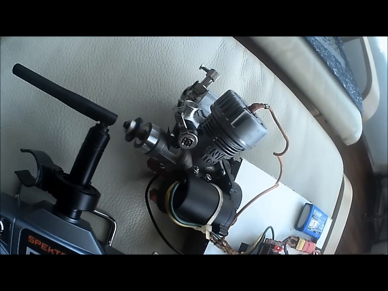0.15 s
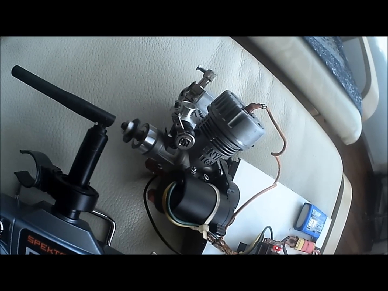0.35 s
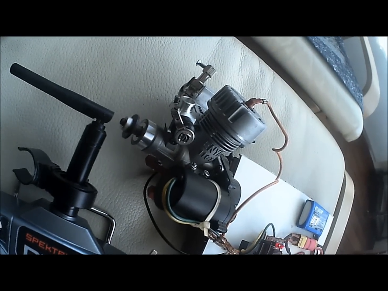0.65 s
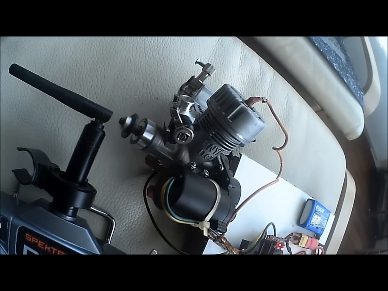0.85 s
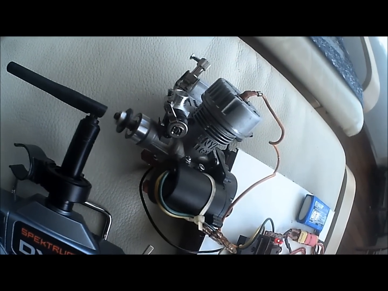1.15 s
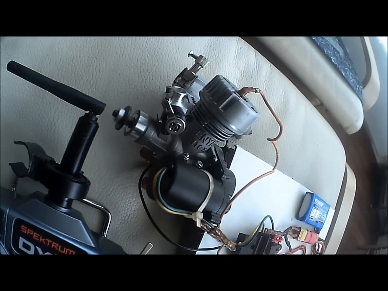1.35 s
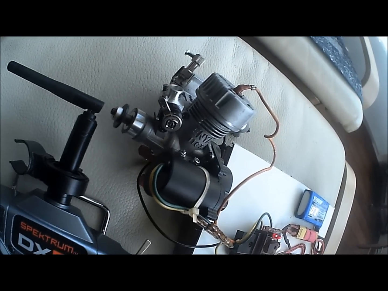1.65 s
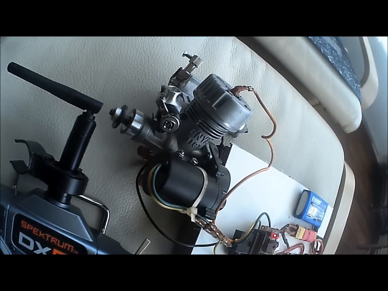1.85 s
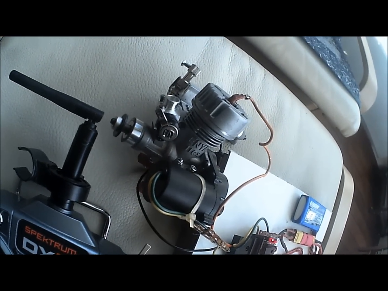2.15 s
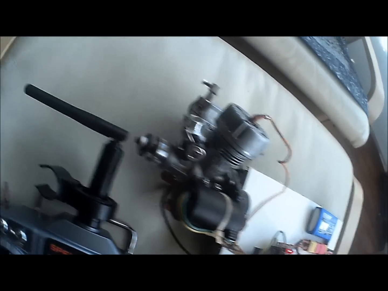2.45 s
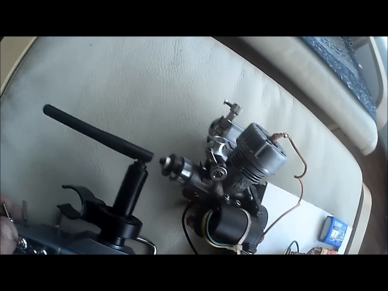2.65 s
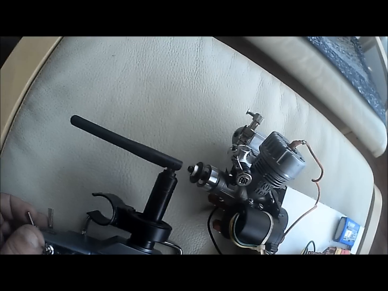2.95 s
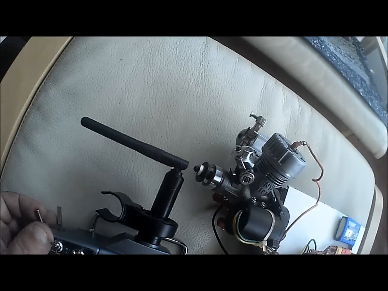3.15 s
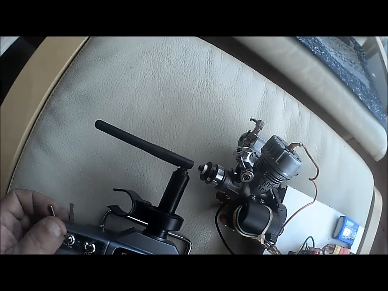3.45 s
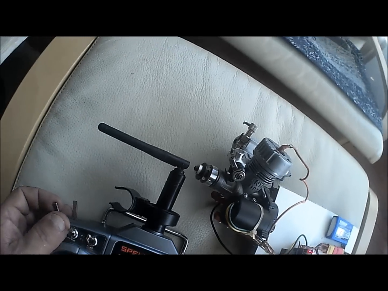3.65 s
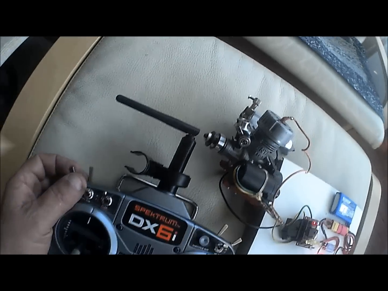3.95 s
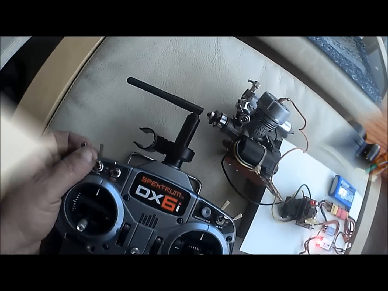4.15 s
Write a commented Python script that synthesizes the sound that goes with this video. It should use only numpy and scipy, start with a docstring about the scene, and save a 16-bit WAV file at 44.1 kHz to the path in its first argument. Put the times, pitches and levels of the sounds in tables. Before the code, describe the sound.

An electric starter spins a small model engine, close to the microphone in a dull, quiet room. It jumps to speed almost at once, then holds a steady buzz of about seventy hollow pops a second, with crankcase knocks, fine metal rattle and high hiss. The microphone draws back around the middle, softening the rattle; near the end the pitch rises slightly.

```python
"""A dull room background, a faint hiss and grinding metal are there at once; then come the pops of an engine.
An electric starter spins a small model engine at about 70 turns a second, close up; it does not fire.
Each turn the exhaust port lets out a puff that rings as a hollow pop; about half a turn later the piston
knocks the crankcase, loose metal rattles in runs of tiny impacts, and air hisses as shaped noise.
The microphone draws back, and near the end the load eases: the shaft speeds up and the pop changes colour."""
import sys
import numpy as np
from scipy import signal
from scipy.fft import rfft, irfft
from scipy.io import wavfile

SR = 44100
rng = np.random.default_rng(int(sys.argv[2]) if len(sys.argv) > 2 else 0)


def wav_record(signal):
    """Record a signal, one row per channel, as 16-bit PCM in the file named by sys.argv[1]."""
    frames = np.transpose(np.atleast_2d(signal))
    bounded = np.clip(frames, -1, 1)
    # unit amplitude maps onto the largest positive 16-bit level
    quanta = np.round(bounded * 32767).astype(np.int16)
    wavfile.write(sys.argv[1], SR, quanta)


N = 189012
TIME = np.arange(N) / SR  # s


def gain_of(db):
    """Logarithmic level: 20 dB is a tenfold amplitude."""
    return 10 ** (np.asarray(db) / 20)


def evened(x):
    """Normalisation: scales a signal to an rms of one."""
    return x / np.sqrt(np.mean(x ** 2) + 1e-20)


def curve(rows):
    """Linear interpolation: a timed table, at every sample."""
    return np.interp(TIME, *np.transpose(rows))


def wander(low_hz, high_hz):
    """Band-limited noise: random motion between two rates, rms one."""
    hz = np.fft.rfftfreq(N, 1 / SR)
    band = (hz > low_hz) / (1 + (hz / high_hz) ** 4)
    return evened(irfft(rfft(rng.standard_normal(N)) * band, N))


def colour(x, db_at, size=8192):
    """Minimum-phase filtering with gain db_at(Hz) in dB: a body rings after a blow, never before."""
    level_db = np.maximum(db_at(abs(np.fft.fftfreq(size, 1 / SR))), -100)
    log_gain = np.log(gain_of(level_db))
    # the Hilbert transform of the log gain gives the phase of a causal ring
    ring = np.fft.ifft(np.exp(np.conj(signal.hilbert(log_gain)))).real
    return signal.oaconvolve(x, ring[:size // 2])[:N]


def spectrum(points):
    """Spectral envelope: a gain rule that joins (frequency [Hz], level [dB]) points on a log axis."""
    hz, db = np.transpose(points)
    return lambda f: np.interp(np.log(f + 1), np.log(hz + 1), db)


def resonances(modes, order=3):
    """Modal summation: the powers of steep-sided modes add, with deep valleys between them."""
    def db_at(f):
        power = sum(gain_of(db) ** 2 / (1 + ((f - hz) / width) ** 2) ** order for hz, width, db in modes)
        return 10 * np.log10(power)
    return db_at


# crank angles [turns]: port opens, piston knocks, play rattles, air whistles
PORT_AT, KNOCK_AT, RATTLE_AT, WHISTLE_AT = .311, .781, .805, .01


def passes(turns, angle):
    """Phase crossing: the times at which the crank passes an angle [turns]."""
    return np.interp(np.arange(angle % 1, turns[-1], 1), turns, TIME)


def blows(times, db):
    """Impulsive excitation at exact times, each impulse shared between two samples."""
    at = np.clip(times * SR, 0, N - 2)
    first, part = at.astype(int), at % 1
    out = np.zeros(N)
    np.add.at(out, first, gain_of(db) * (1 - part))
    np.add.at(out, first + 1, gain_of(db) * part)
    return out


def bursts(times, db, hold, decay):
    """Amplitude modulation: noise starts at each time, holds and dies away exponentially [s]."""
    t = TIME[:SR // 20]
    power = np.exp(-2 * np.maximum(t - hold, 0) / decay)
    total_power = abs(signal.oaconvolve(blows(times, 2 * db), power)[:N])  # doubled dB: power, not amplitude
    return evened(np.sqrt(total_power) * rng.standard_normal(N))


# the spin-up begins this far short of speed [turns/s] and closes the gap with this time constant [s]
SHORT_HZ, SPIN_UP_S = 18.26, .04


def spin_up():
    """Exponential relaxation: the share of the spin-up still to come, one at the start, soon zero."""
    return np.exp(-TIME / SPIN_UP_S)


# microphone drawing back from the engine: (time [s], share of the way [0-1])
MIC_AWAY = [(2.4, 0.4), (2.7, 0.67), (3.3, 0.91), (4.29, 1)]
# easing of the load: (time [s], easing [0-1])
LOAD_EASE = [(3.3, 0.15), (3.52, 0.82)]


def level(db, start_db, away_db, eased_db):
    """Additive gains in dB, as the shaft spins up, the microphone draws back and the load eases."""
    return gain_of(db + start_db * spin_up() + away_db * curve(MIC_AWAY) + eased_db * curve(LOAD_EASE))


# limit of the random swell [dB], rate above which it falls away [Hz], limit of the extra jolt [dB]
SHAKE_DB, SHAKE_HZ, JOLT_DB = 1.5, 3.6, 2.5
JOLT_HZ_PER_S = 4.3  # acceleration at which the jolt levels off [turns/s per s]


def shaking(speed):
    """Forced vibration on the mount: swells at random within limits, and more as the shaft speeds up."""
    gathering = np.maximum(np.gradient(speed, TIME), 0)
    jolt = np.tanh(gathering / JOLT_HZ_PER_S)
    swell = np.tanh(wander(1, SHAKE_HZ))
    return gain_of(SHAKE_DB * swell + JOLT_DB * jolt)


FLUTTER_S = .00007  # stray from even turning, before the shake scales it [s rms]


def crank(speed, shake, slow_hz=6, fast_hz=17):
    """Phase integration: speed adds up to angle [turns], slightly ahead and behind as the engine shakes."""
    stray = FLUTTER_S * shake * wander(slow_hz, fast_hz)
    return np.cumsum(speed) / SR + speed * stray


# room background: (frequency [Hz], relative level [dB per Hz])
ROOM_SPECTRUM = [(15, -8), (55, -7), (100, -11), (300, -5), (1200, -11.5), (2300, -14), (15000, -28.5)]


def room(level_db=-41):
    """Stationary coloured noise: a dull, steady background."""
    return gain_of(level_db) * evened(colour(rng.standard_normal(N), spectrum(ROOM_SPECTRUM)))


# air squeezed past the piston: (frequency [Hz], relative level [dB per Hz])
HISS_SPECTRUM = [(4000, -50), (9000, -24), (10850, -18), (11350, -1), (12550, -2), (12950, -10),
                 (13300, -9), (13600, -2), (14800, -3), (15200, -10), (15800, -25)]
# thin whistles in that air: (frequency [Hz], width [Hz], relative level [dB])
WHISTLE_MODES = [(11700, 120, -5), (12305, 30, -5), (14470, 70, 0)]
# hiss: (at full speed [dB], change at start of spin-up [dB], when drawn back [dB], when eased [dB])
HISS_LEVELS = (-33.5, -3, -1.5, -5)
# whistles swell, then fade as the microphone leaves their path: (time [s], level [dB])
WHISTLE_LEVELS = [(0, -39), (.6, -34.5), (1.4, -34.5), (1.85, -31.5), (2.45, -36), (2.7, -45), (4.29, -44)]


def leak(turns, spread_db=0.1, steady_db=-8):
    """Turbulent flow noise: compressed air hisses past the piston at each stroke's top, then whistles."""
    def gusts(angle, hold, decay):
        """Periodic modulation: one noise burst a turn, at the given crank angle."""
        times = passes(turns, angle)
        return bursts(times, spread_db * rng.standard_normal(len(times)), hold, decay)
    air = gusts(RATTLE_AT, hold=.0042, decay=.003)
    air = air + gain_of(steady_db) * rng.standard_normal(N)
    hiss = evened(colour(air, spectrum(HISS_SPECTRUM)))
    squeeze = gusts(WHISTLE_AT, hold=.001, decay=.0018)
    whistle = evened(colour(squeeze, resonances(WHISTLE_MODES, order=2)))
    return level(*HISS_LEVELS) * hiss + gain_of(curve(WHISTLE_LEVELS)) * whistle


def bounces(times, clack_db, modes, spread_db, fade_db, grind_db, gap_s=.0003, count=24):
    """Repeated impact: fading runs of tiny hits, over faint steady grinding, ring the modes of one part."""
    ordinary_db = spread_db * np.minimum(rng.standard_normal(len(times)), 1.3)
    size_db = np.where(clack_db > 0, clack_db, ordinary_db)
    hit_times = times[:, None] + gap_s * (np.arange(count) + rng.random((len(times), count)))
    hit_db = size_db[:, None] - fade_db * np.arange(count)
    hits = evened(blows(hit_times.ravel(), hit_db.ravel()))
    grinding = gain_of(grind_db) * rng.standard_normal(N)
    return colour(hits + grinding, resonances(modes))


# cylinder and fins, shaken by the rod: (frequency [Hz], width [Hz], relative level [dB])
FIN_MODES = [(2790, 220, -8), (3260, 380, -8.5), (3550, 184, 2)]
# starter gears: (frequency [Hz], width [Hz], relative level [dB])
GEAR_MODES = [(4690, 134, -9), (4865, 84, -2.5), (5224, 295, -10.5), (6715, 500, -13), (7636, 270, -8.5),
              (8530, 930, -16.5), (10010, 470, -16.5)]
# hardest clacks of the loose parts: (time [s], level above an ordinary turn [dB])
HARD_CLACKS = [(0.956, 5.2), (2.327, 5.8), (2.482, 5.2), (3.556, 5.1), (3.904, 6.4)]
# rattle: (at full speed [dB], change at start of spin-up [dB], when drawn back [dB], when eased [dB])
RATTLE_LEVELS = (-26, -6, -4, 1)
CLACK_SHARE, CLACK_DB = .05, 4.5  # chance clacks: share of the turns, level above an ordinary turn [dB]


def rattle(turns, low_hz=2570):
    """Backlash: as the load reverses, rod and gears take up their play, shake the metal and may clack."""
    times = passes(turns, RATTLE_AT)
    clack_db = CLACK_DB * (rng.random(len(times)) < CLACK_SHARE)
    for s, db in HARD_CLACKS:
        clack_db[np.argmin(abs(times - s))] = db
    fins = bounces(times, clack_db, FIN_MODES, spread_db=1.3, fade_db=0.74, grind_db=-4.0)
    gears = bounces(times, clack_db, GEAR_MODES, spread_db=0.9, fade_db=.5, grind_db=-2.5)
    small_parts = signal.butter(10, low_hz, "high", fs=SR, output="sos")  # too small to radiate low notes
    return level(*RATTLE_LEVELS) * evened(signal.sosfilt(small_parts, fins + gears))


# pop under load: (multiple of the shaft speed, relative level [dB])
LOADED_ORDERS = [(1, -9), (2, -6), (3, -3.5), (4, -4), (5, -2), (6, -18), (7, -2.5), (8, -5.5), (9, -8),
                 (10, 2.8), (11, -5.5), (12, 3), (13, -8), (14, -5.5), (15, -8.5), (16, 3.5), (17, 1),
                 (18, -2), (19, -1), (20, 5.5), (21, -5), (22, -17), (23, -6.5), (24, -29), (25, -6),
                 (26, -15), (27, -19), (28, -24), (29, -24), (30, -73)]
# pop running freely: (multiple of the shaft speed, relative level [dB])
FREE_ORDERS = [(1, -14.5), (2, -10.5), (3, -7.5), (4, -6), (5, -8), (6, -21.5), (7, -5.5), (8, -4.5),
               (9, -12), (10, -8), (11, 3.5), (12, 5.5), (13, -7.5), (14, -6.5), (15, -10), (16, 3),
               (17, 0), (18, 7), (19, -10.5), (20, -8.5), (21, -7), (22, -33), (23, -12.5), (24, -21),
               (25, -19), (26, -49), (27, -55), (28, -40), (29, -33), (30, -52)]
# pop: (at full speed [dB], change at start of spin-up [dB], when drawn back [dB], when eased [dB])
POP_LEVELS = (-16.5, -5, -2, 3)
LOADED_HZ, FREE_HZ = 70.75, 71.6  # shaft speeds that place the two pop spectra [turns/s]
# hollow cylinder note: pitch [Hz], width [Hz], level before its fade [dB], time to fall to 1/e [s]
HOLLOW_HZ, HOLLOW_WIDTH_HZ, HOLLOW_DB, LABOUR_S = 752, 140, -23.5, 0.071


def exhaust(turns, spread_db=0.4):
    """Source and filter: one puff a turn as the port opens, ringing in the cylinder and exhaust stub."""
    times = passes(turns, PORT_AT)
    puffs = blows(times, spread_db * rng.standard_normal(len(times)))
    body = signal.butter(6, 1200, fs=SR, output="sos")

    def voiced(orders, shaft_hz):
        """Spectral shaping: puffs take the order levels, then an even strength below 1200 Hz."""
        peaks = [(k * shaft_hz, db) for k, db in orders]
        pop = colour(puffs, spectrum([(7.3, 2)] + peaks + [(2400, -53.5), (4000, -71.5)]))
        return pop / np.std(signal.sosfilt(body, pop))
    ease = np.clip(curve(LOAD_EASE), 0, 1)
    pops = (1 - ease) * voiced(LOADED_ORDERS, LOADED_HZ) + ease * voiced(FREE_ORDERS, FREE_HZ)
    cavity = resonances([(HOLLOW_HZ, HOLLOW_WIDTH_HZ, 0)], order=2)
    hollow = gain_of(HOLLOW_DB) * evened(colour(puffs, cavity))
    labour = np.exp(-(TIME / LABOUR_S) ** 2)  # the laboured strokes of the spin-up
    return level(*POP_LEVELS) * pops + labour * hollow


# crankcase, struck by the piston: (frequency [Hz], width [Hz], relative level [dB])
CASE_MODES = [(502, 70.5, -4.5), (783, 34, 0.5), (1300, 103.6, -3.5), (1338, 35.5, -4), (1732, 83, -22),
              (1968, 47, -28)]
# knock: (at full speed [dB], change at start of spin-up [dB], when drawn back [dB], when eased [dB])
KNOCK_LEVELS = (-19.5, -5, -1, 0.5)


def piston(turns, shake, jitter_s=.00005, spread_db=1.27, chatter_db=-4, chatter_spread_db=3):
    """Impact excitation: the piston rocks over at its top, knocks the crankcase, then chatters briefly."""
    times = passes(turns, KNOCK_AT)
    late, size, loose = rng.standard_normal((len(times), 3)).T
    stray = jitter_s * np.interp(times, TIME, shake)
    knock = colour(blows(times + stray * late, spread_db * size), resonances(CASE_MODES, order=2))
    scuffs = bursts(times, chatter_spread_db * np.minimum(loose, 1), hold=.003, decay=.003)
    chatter = colour(scuffs, resonances(CASE_MODES[2:], order=2))  # too brief and light to move the low modes
    return level(*KNOCK_LEVELS) * (evened(knock) + gain_of(chatter_db) * evened(chatter))


# speed the starter can hold against the load, before the spin-up shortfall: (time [s], speed [turns/s])
HELD_SPEED = [(.9, 70.64), (1.35, 70.88), (1.8, 70.77), (3.0, 70.74), (3.38, 70.27), (3.53, 72.45),
              (3.66, 71.72), (4.29, 71.5)]


def scene():
    """Superposition: the engine sounds follow one crank and add to the room at one close microphone."""
    speed = curve(HELD_SPEED) - SHORT_HZ * spin_up()
    shake = shaking(speed)
    turns = crank(speed, shake)
    mix = room() + leak(turns) + rattle(turns) + exhaust(turns) + piston(turns, shake)
    return mix[None]


EDGE_HZ = 15800  # upper band limit


def record(dry, knee=0.98):
    """Transduction: no steady pressure passes, peaks saturate near full scale, then the band is limited."""
    dry = signal.sosfilt(signal.butter(1, 5, "high", fs=SR, output="sos"), dry)
    over = np.maximum(abs(dry) - knee, 0)
    rounded = (1 - knee) * np.tanh(over / (1 - knee))
    held = dry - np.sign(dry) * (over - rounded)
    band = signal.firwin(511, EDGE_HZ, window=("kaiser", 9), fs=SR)
    return signal.oaconvolve(held, band[None], "same")


dry = scene()
out = record(dry)
wav_record(out)
```